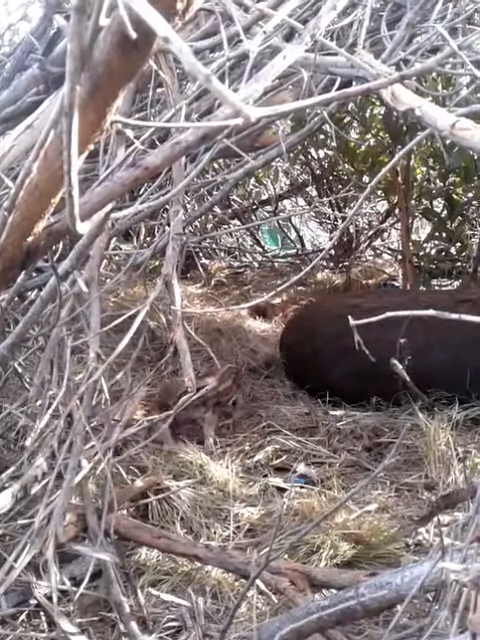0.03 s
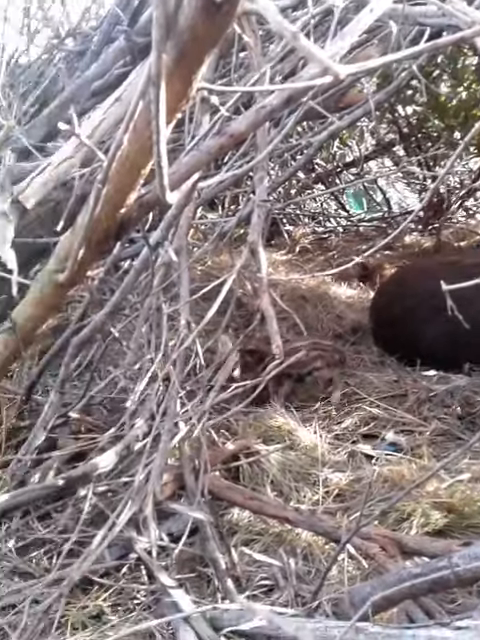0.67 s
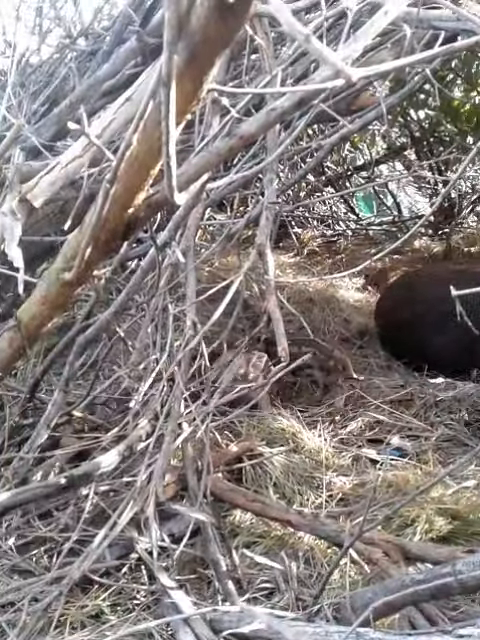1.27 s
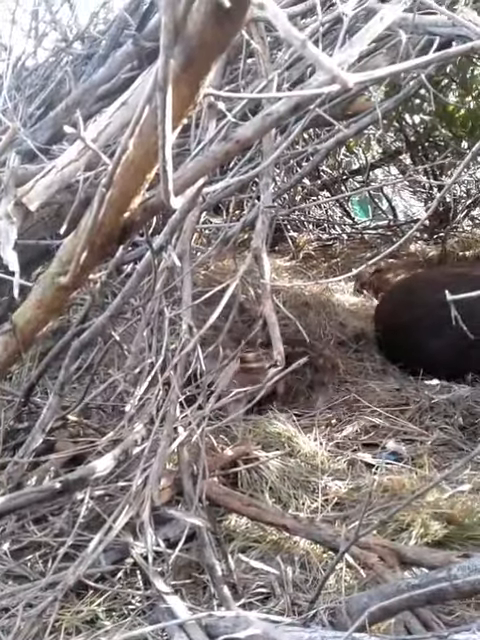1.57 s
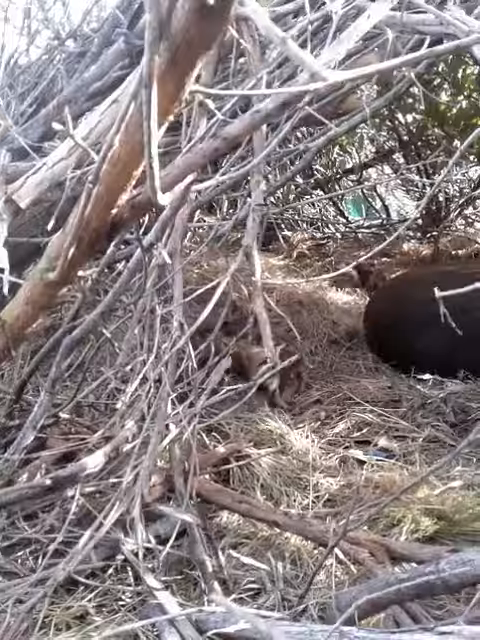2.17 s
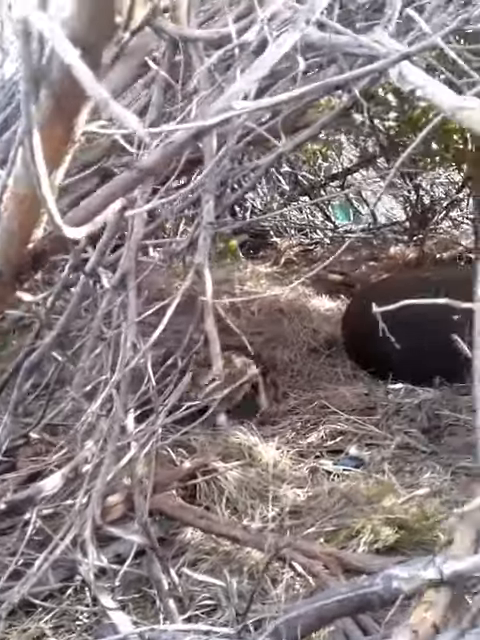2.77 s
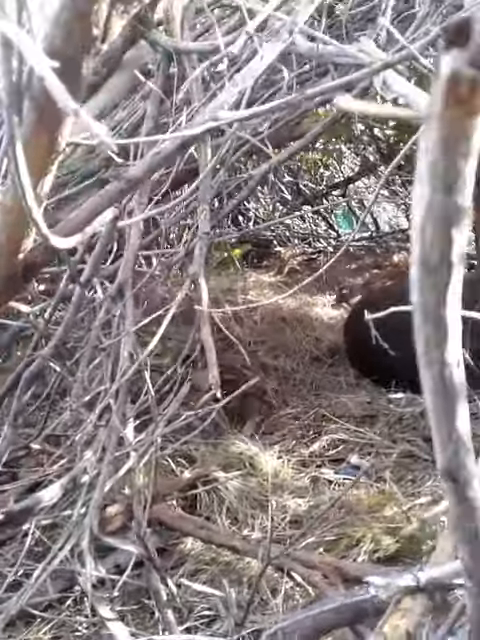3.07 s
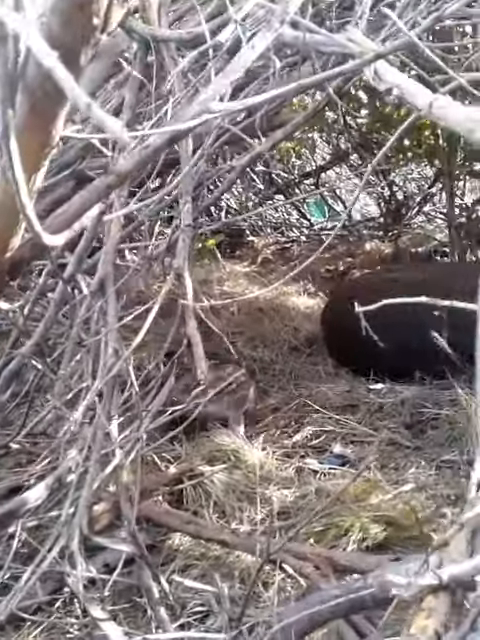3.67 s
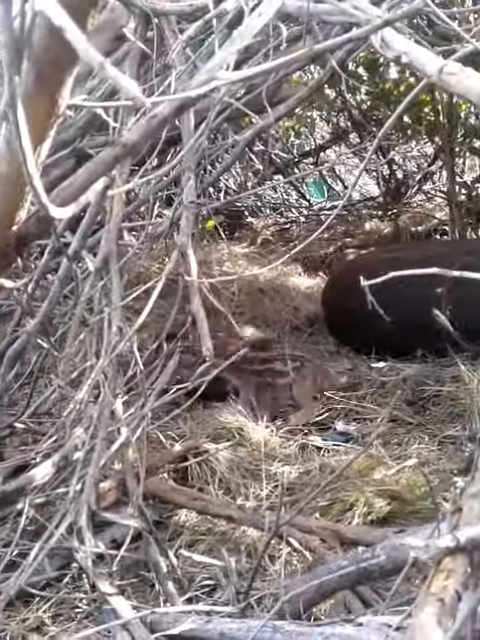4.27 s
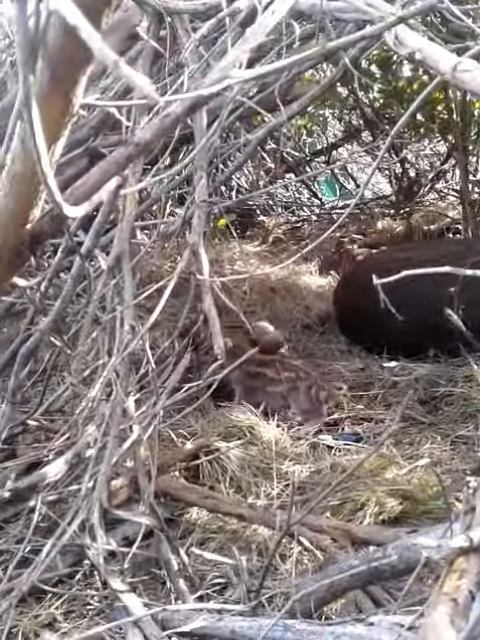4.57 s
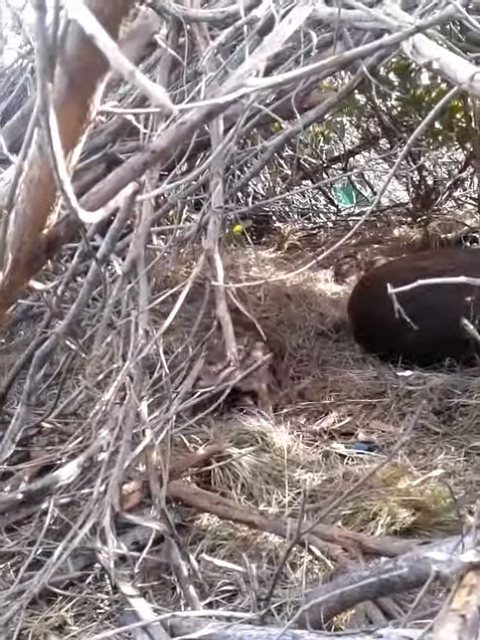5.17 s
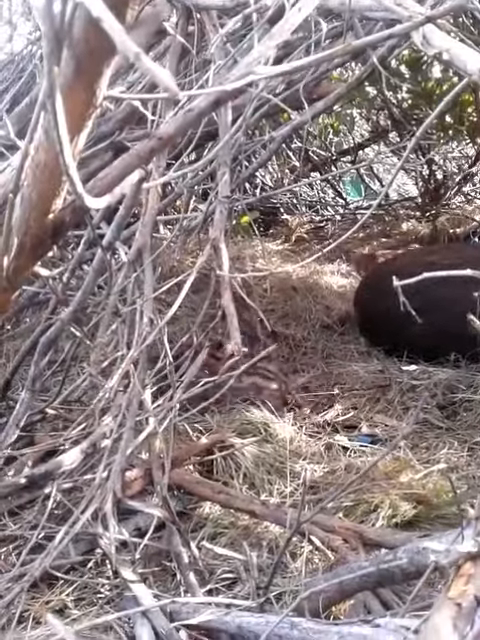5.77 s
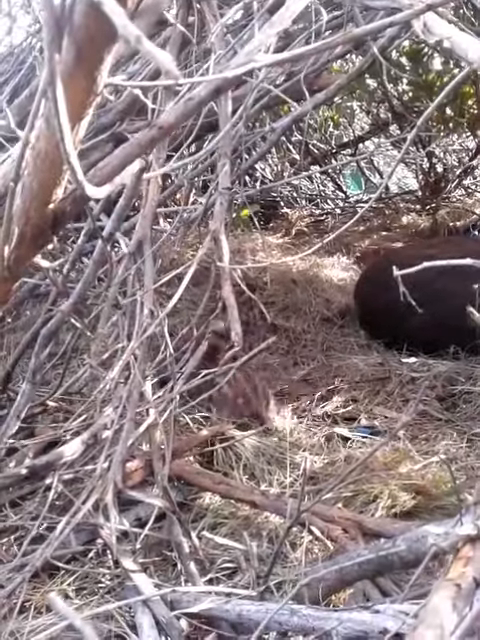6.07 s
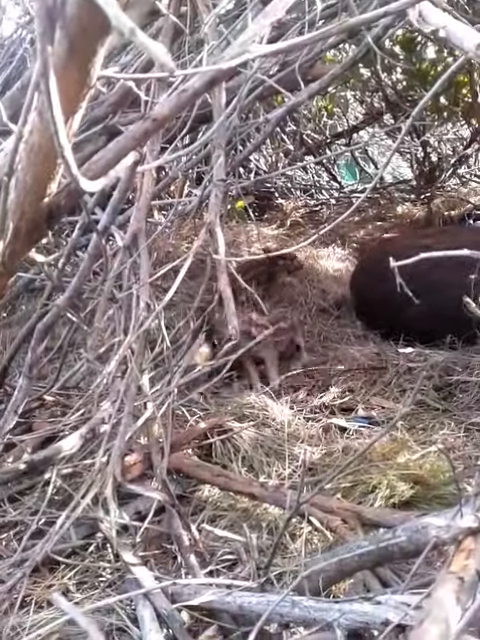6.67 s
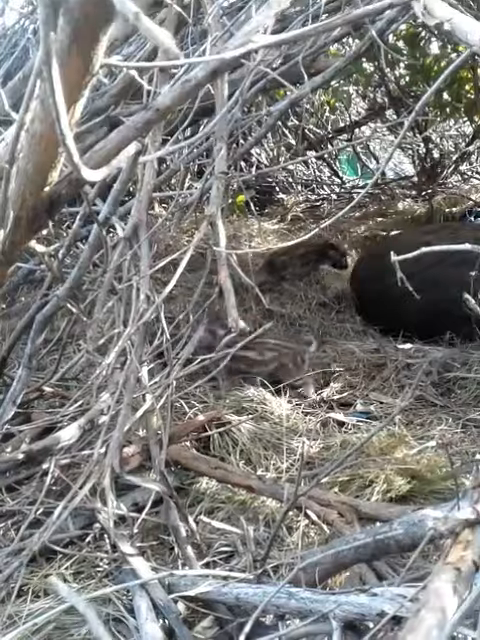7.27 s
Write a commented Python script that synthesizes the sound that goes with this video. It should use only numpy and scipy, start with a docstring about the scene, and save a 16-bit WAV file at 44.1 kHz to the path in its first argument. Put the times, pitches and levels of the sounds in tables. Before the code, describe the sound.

Dry straw crackles and twigs snap as young animals shuffle under dead branches, over a low wind rumble and a faint distant engine.

```python
"""Dry straw crackles and twigs snap, a few metres from the microphone, in the open air.
Young animals are shuffling under a heap of dead branches: each push breaks countless stalks,
twigs scrape over each other, and now and then a knock rings a branch. A faint whistle dies away early.
Behind the heap, a low rumble of wind lulls, then slowly swells along with a far engine.
Heard from one spot, almost mono: only a faint hiss at the microphone ports differs left and right."""
import sys
import numpy as np
from scipy import signal
from scipy.fft import rfft, irfft, next_fast_len
from scipy.io import wavfile
from scipy.ndimage import uniform_filter1d

SR = 44100
rng = np.random.default_rng(int(sys.argv[2]) if len(sys.argv) > 2 else 0)


def store_pcm(level_fs):
    """Save levels as 16-bit WAV."""
    pcm = np.round(np.clip(level_fs, -1, 1) * 32767).astype(np.int16)
    wavfile.write(sys.argv[1], SR, np.atleast_2d(pcm).T)


N = 327663
TIME = np.arange(N) / SR


# steps and shoves under the heap: t/s, push length/s, fine straw level/dB, coarse stalk level/dB
SHUFFLES = [(-.02, 0.22, -43, -56.5), (0.279, 0.11, -45.5, -59), (.385, 0.025, -42, -56),
            (.444, 0.17, -50.5, -62.5), (.63, 0.13, -49.5, -64.5), (.79, .11, -51.5, -64),
            (.973, 0.093, -52.5, -72), (1.115, .06, -54, -67), (1.28, .06, -50, -64),
            (1.38, 0.11, -56, -66), (1.479, 0.11, -45, -56), (1.625, 0.085, -58, -68),
            (1.725, 0.24, -49.5, -63), (2.03, 0.047, -54.5, -61), (2.155, 0.11, -53, -63),
            (2.355, 0.13, -55, -63), (2.6, 0.13, -51.5, -60), (2.825, 0.16, -46, -62),
            (3.025, 0.074, -48, -62), (3.215, 0.058, -49.5, -63.5), (3.305, .05, -47, -61),
            (3.484, 0.18, -48, -63), (3.705, 0.042, -43.5, -60), (3.79, 0.15, -48.5, -61),
            (3.949, .14, -48.5, -64), (4.136, .14, -44.5, -62.5), (4.305, 0.073, -48.5, -59),
            (4.455, 0.097, -48.5, -67), (4.577, 0.063, -44.5, -60.5), (4.717, 0.074, -46.5, -61.5),
            (4.86, 0.15, -46.5, -62.5), (4.985, 0.045, -44.5, -58.5), (5.06, 0.11, -42.5, -59),
            (5.212, 0.034, -50, -61), (5.285, 0.08, -46, -59.5), (5.39, .2, -52, -63.5),
            (5.666, 0.044, -49.5, -73), (5.76, 0.11, -49, -63), (5.96, 0.13, -43.5, -68),
            (6.1, .15, -47.5, -58), (6.305, 0.21, -46.5, -62.5), (6.5, .13, -50.5, -65),
            (6.64, 0.047, -46, -61), (6.715, 0.028, -42.5, -56.5), (6.818, 0.095, -52, -75),
            (6.917, 0.16, -48.5, -62), (7.09, 0.061, -44, -62), (7.226, 0.096, -49, -69),
            (7.341, .09, -47.5, -65)]
def shuffles(attack_s=0.028, settle_s=0.06, stir_start_db=-60, stir_db_per_s=0.61):
    """Straw and stalk levels in dB: a foot loads the litter, holds, and lets it settle."""
    clock = TIME[::44]  # about 1 ms steps
    # the litter never lies quite still, and the animals grow livelier
    stir = undb(stir_start_db + stir_db_per_s * clock)
    straw_power = stir ** 2
    stalk_power = (stir * undb(-11.5)) ** 2
    for s, length_s, straw_db, stalks_db in SHUFFLES:
        t = clock - s
        push = np.clip(t / attack_s, 0, 1) * np.exp(-np.maximum(t - length_s, 0) / settle_s)
        straw_power += (push * undb(straw_db)) ** 2
        stalk_power += (push * undb(stalks_db)) ** 2
    return [np.interp(TIME, clock, 10 * np.log10(power)) for power in (straw_power, stalk_power)]


# spectra of fine straw, brittle stems, splintering tips and coarse stalks: f/Hz, relative level/dB
STRAW_SPECTRUM = [(1000, -40), (2500, -30.5), (4000, -24.5), (5000, -11.5), (5700, -7), (6400, -0.2),
                  (7300, 1), (8000, -2.5), (9000, -8.5), (10200, -16.5), (12500, -19), (15500, -18.5)]
STEM_SPECTRUM = [(1000, -33.5), (3000, -14.5), (5000, -7), (7000, 5.5), (9000, -2.5), (11000, -10),
                 (15500, -13)]
SPLINTER_SPECTRUM = [(4000, -35), (8000, -34), (10500, 8.5), (13000, 11.5), (15500, 2)]
STALK_SPECTRUM = [(300, -26.5), (680, -8), (950, -6.5), (1300, -6.5), (1700, -5.5), (3000, -2.5),
                  (4300, 2.5), (6000, 0), (10000, -25)]
def litter():
    """A few metres off, fine straw and coarse stalks give way in little fits under the animals' feet."""
    straw_db, stalks_db = shuffles()
    fits_db = walk(70) + 1.35 * walk(25)
    # a mass of buried blades, and fewer, crisper ones lying on top
    buried = crackle(per_s=4500, spread_db=3.5, scatter_s=0.0042, scatter_db=4)
    on_top = crackle(per_s=320, spread_db=2, scatter_s=0.001, scatter_db=-6)
    straw = unit(colour(buried + undb(-10.5) * on_top, STRAW_SPECTRUM))
    # single stems tick clear of the mass
    stem_breaks = crackle(per_s=45, spread_db=1, scatter_s=0.0015, scatter_db=-4)
    ticks = unit(colour(stem_breaks, STEM_SPECTRUM)) * undb(-15.5)
    # the driest tips add a flickering sizzle, stronger under a harder push
    tips_db = -23 + 0.2 * (straw_db - straw_db.mean()) + 4.5 * walk(21)
    tip_breaks = crackle(per_s=500, spread_db=2, scatter_s=0.0025, scatter_db=-1)
    tips = unit(colour(tip_breaks, SPLINTER_SPECTRUM)) * undb(tips_db)
    stalk_breaks = crackle(per_s=800, spread_db=1.5, scatter_s=0.008, scatter_db=3.5)
    stalks = unit(colour(stalk_breaks, STALK_SPECTRUM))
    return undb(fits_db) * ((straw + ticks + tips) * undb(straw_db) + stalks * undb(stalks_db))


def crackle(per_s, spread_db, scatter_s, scatter_db):
    """Tiny fractures, mostly weak and a few strong, each scattered briefly by the twigs around."""
    breaks = rng.random(N) < per_s / SR
    strength = undb(spread_db * np.minimum(rng.exponential(size=N), 5))
    clicks = breaks * strength * rng.choice([-1, 1], N)
    t = TIME[:2048]
    echoes = rng.standard_normal(len(t)) * np.exp(-t / scatter_s)
    echo_power = np.maximum(signal.fftconvolve(clicks ** 2, echoes ** 2)[:N], 0)
    scattered = np.sqrt(echo_power) * rng.standard_normal(N)
    return unit(unit(clicks) + undb(scatter_db) * unit(scattered))


# spectra of a twig's sharp crack and of its woody body: f/Hz, relative level/dB
CRACK_SPECTRUM = [(1000, -40.5), (4000, -8.5), (5300, -6.5), (6200, 4.5), (7300, 10.5), (8200, 0),
                  (9200, -3), (10500, -17), (15500, -26)]
WOOD_SPECTRUM = [(250, -20), (450, -12.5), (680, -37), (1000, -15.5), (1800, -12.5), (2800, -3),
                 (4200, 1.5), (5500, 5), (8000, -26), (15000, -39)]
# twigs and stalks breaking in the heap: t/s, crack level/dB, body level/dB, splinter level/dB
SNAPS = [(0.035, -37, -39.5, -54), (0.0383, -35.5, -34.5, -62), (0.145, -37, -68, -58.0),
         (0.157, -33.5, -36, -57.0), (0.169, -34, -34.5, -55), (0.206, -20.5, -41, -40),
         (0.2087, -34, -37, -52), (0.2232, -33.5, -45, -42), (0.238, -39, -62.0, -61),
         (0.4119, -38.5, -52, -46), (0.827, -43, -65, -61), (0.867, -45, -72, -57.0),
         (1.3301, -44, -63, -66), (1.505, -45, -45.5, -66.0), (1.5852, -32.5, -57, -49),
         (1.7154, -43, -52, -62), (1.777, -43.5, -65, -63), (1.9538, -43, -51, -56), (2.737, -45, -52, -63),
         (2.8813, -38.5, -62, -64), (4.2494, -35.5, -60, -50), (4.255, -42, -65, -54),
         (4.345, -40, -48.5, -53), (4.607, -46, -64, -53), (4.7535, -42, -66, -60), (5.1223, -44, -58, -46),
         (5.1679, -33, -46, -55), (5.171, -48, -48, -58), (5.264, -43.5, -62, -59), (5.324, -43, -64, -50),
         (5.357, -46, -68.0, -51), (5.513, -42, -52, -54), (5.692, -45, -60, -58),
         (5.775, -40.5, -48, -62.0), (5.793, -41.5, -50, -59), (5.8147, -41, -39.5, -38),
         (6.026, -52, -74, -52), (6.4193, -37.5, -57, -46), (6.688, -39, -57, -49), (7.158, -44, -53, -52)]
def snaps(break_s=0.0021, scatter_s=0.012, scatter_db=-14):
    """The fibres of a twig tear within a millisecond or two; the heap scatters a short tail."""
    track, t = np.zeros(N), TIME[:2048]
    envelope = np.exp(-(t / break_s) ** 2) + undb(scatter_db) * np.exp(-t / scatter_s)
    for s, *levels_db in SNAPS:
        tear = envelope * rng.standard_normal(len(t))
        for spectrum, db in zip((CRACK_SPECTRUM, WOOD_SPECTRUM, SPLINTER_SPECTRUM), levels_db):
            add(track, s, colour(tear, spectrum), db)
    return track


# twigs flicking or dragging over each other: t/s, f/Hz, level/dB, contact decay/s
SCRAPES = [(0.035, 4450, -38.5, 0.0033), (1.005, 5600, -51, 0.04), (1.304, 2510, -59.5, 0.013),
           (2.0132, 3120, -47, .0015), (2.018, 3150, -57, 0.01), (2.0575, 2710, -59, 0.0027),
           (2.622, 6100, -40.5, 0.015), (3.052, 3700, -53, 0.0076), (3.076, 3420, -57, 0.012),
           (3.595, 3860, -55, .005), (4.893, 3750, -58, 0.0034), (5.168, 4770, -46, 0.0024),
           (5.373, 5630, -44.5, .004), (5.559, 3150, -60, 0.0043), (5.811, 5000, -40.5, 0.0023),
           (7.158, 4300, -54, .008)]
def scrapes(t60=0.0066, grit_gain=0.2):
    """Rough bark catches and slips while the contact lasts, and rings the thin twig."""
    track, t = np.zeros(N), TIME[:6000]
    for s, hz, db, contact_s in SCRAPES:
        slips = rng.standard_normal(len(t)) * np.exp(-t / contact_s)
        ringing = signal.fftconvolve(slips, ring(hz, t60, t))[:len(t)]
        twig = unit(np.gradient(ringing))  # the ring carries hardly any bass
        grit = unit(colour(slips, CRACK_SPECTRUM))
        add(track, s, twig + grit_gain * grit, db)
    return track


# modes of a thick dead branch: f/Hz, relative level/dB, t60/s
BRANCH_MODES = [(440, -8.5, 0.032), (950, 1, 0.024), (1082, -11, 0.068), (1650, -4, 0.023),
                (1905, -1.5, 0.012), (2040, -7, 0.035), (2790, -9, 0.024), (3230, -6, .02)]
# blows on the branches: t/s, level/dB, pitch/ratio to those modes, hardness/dB per octave
KNOCKS = [(0.2084, -53, 0.67, 7), (1.5031, -43.5, 1.0, 2.5), (1.507, -52, 0.93, 12), (1.586, -52, 0.98, 8),
          (5.8119, -50, .92, -3), (5.841, -54.5, 0.94, -5)]
def knocks():
    """A blow rings a branch in the heap; the harder it is, the more of the high modes."""
    track, t = np.zeros(N), TIME[:6000]
    for s, db, pitch, hardness in KNOCKS:
        branch = np.zeros(len(t))
        for hz, mode_db, t60 in BRANCH_MODES:
            gain = rng.choice([-1, 1]) * undb(mode_db + hardness * np.log2(hz))
            branch += gain * ring(hz * pitch, t60, t)
        add(track, s, branch, db)
    return track


def whistle(hz=1464, db=-62.5, t60=1.6):
    """A faint wavering whistle, perhaps air across a twig, dies away at the start."""
    tone = wavering_tone(hz, depth=0.014, per_s=44.4)
    fade = np.exp(-np.log(1000) * TIME / t60)
    return tone * fade * undb(db + 4.1 * walk(28))


# spectra of the wind's rumble, its rush in the trees and a far, narrow rush: f/Hz, relative level/dB
RUMBLE_SPECTRUM = [(20, -40.5), (40, -22.5), (52, -19.5), (65, -7.5), (85, -3.5), (105, -1.5), (135, 1.5),
                   (200, 0.5), (250, -5.5), (300, -14.5), (400, -25), (700, -33.5), (2000, -65)]
AIR_SPECTRUM = [(30, -20.5), (150, -2.5), (350, 2.5), (480, 0), (680, -2), (820, -2.5), (950, -0.5),
                (1200, -2), (1550, -1.5), (2200, -5.5), (4000, -7), (7000, 0.5), (10000, -7),
                (15500, -12.5)]
FAR_RUSH_SPECTRUM = [(400, -33.5), (700, -9.5), (830, 0.5), (970, -2.5), (1150, -14.5), (2000, -33.5)]
# the far rush rising with the wind: t/s, level/dB
FAR_RUSH = [(2.3, -95), (2.6, -74.5), (3.8, -80), (4.3, -73.5), (5.3, -69.5), (6.0, -79), (7.43, -73)]
# the wind behind the heap, a lull and then a swell: t/s, rumble level/dB, air level/dB
WIND = [(0.0, -56, -59), (.4, -57.5, -61), (1.25, -61, -66.5), (2.3, -58, -63), (2.8, -56, -59.5),
        (3.9, -53, -61.5), (5.7, -51.5, -62), (6.3, -50, -57.5), (7.43, -51, -60.5)]
def wind(deep_hz=110, deep_share=0.62):
    """Wind rumbles and rushes through the trees, with small gusts on top of its slow swell."""
    rumble_db, air_db = curves(WIND)
    far_db, = curves(FAR_RUSH)
    gust_db = 0.2 * walk(5)
    eddies = noise(RUMBLE_SPECTRUM)
    # the deepest rumble follows only a share of the swell
    deep = signal.sosfiltfilt(signal.butter(3, deep_hz, fs=SR, output="sos"), eddies)
    deep_db = deep_share * rumble_db + (1 - deep_share) * rumble_db.mean()
    rumble = (deep * undb(deep_db) + (eddies - deep) * undb(rumble_db)) * undb(gust_db)
    air = noise(AIR_SPECTRUM) * undb(air_db + 0.8 * gust_db)
    far_rush = noise(FAR_RUSH_SPECTRUM) * undb(far_db + gust_db)
    return rumble + air + far_rush


# the far engine's two tones: t/s, lower f/Hz, its level/dB, upper f/Hz, its level/dB
ENGINE = [(0, 116.7, -65, 180, -73), (1.5, 118.5, -66, 175.4, -69), (2.9, 120.1, -64.5, 175.6, -58),
          (4.3, 119.4, -57.5, 175, -59), (5.2, 125.4, -58, 170.3, -59), (6.2, 126.9, -63, 168.8, -56.5),
          (7.43, 125, -60, 167.8, -56.5)]
def engine():
    """Far from the microphone an engine drones on two tones, unsteady in pitch and level."""
    low_hz, low_db, high_hz, high_db = curves(ENGINE)
    drone = np.zeros(N)
    for hz, db in (low_hz, low_db), (high_hz, high_db):
        tone = np.sqrt(2) * wavering_tone(hz, depth=0.01438, per_s=14)  # rms 1
        drone += tone * undb(db + 2 * walk(17))
    return drone


# spectrum of the hiss right at the microphone: f/Hz, relative level/dB
PORT_SPECTRUM = [(30, -4), (70, 1), (150, -11), (300, 8), (500, 12), (1000, 8), (2000, -13.5),
                 (4000, -17.5), (7000, -28), (10000, -8.5), (15500, 3.5)]
def port_hiss(db=-78):
    """The air stirs a faint, unsteady hiss of its own at each microphone port, left and right."""
    return np.array([undb(db + 1.3 * walk(30)) * noise(PORT_SPECTRUM) for _ in range(2)])


def undb(db):
    """Decibels to gain."""
    return 10 ** (np.asarray(db) / 20)


def unit(x):
    """Scale to rms 1."""
    return x / np.sqrt(np.mean(x ** 2))


def curves(table):
    """The columns of a table, joined by straight lines in time."""
    s, *columns = np.transpose(table)
    return [np.interp(TIME, s, column) for column in columns]


def colour(x, spectrum):
    """Minimum-phase filter with the given outline (f/Hz, level/dB)."""
    size = 2 * next_fast_len(len(x))
    hz, db = np.transpose(spectrum)
    bin_hz = np.maximum(np.arange(size // 2 + 1) * SR / size, 1)
    gain = undb(np.interp(np.log(bin_hz), np.log(hz), db))
    cepstrum = irfft(np.log(gain))
    # fold onto positive time, so nothing rings ahead of a click
    cepstrum[1:size // 2] *= 2
    cepstrum[size // 2 + 1:] = 0
    return irfft(rfft(x, size) * np.exp(rfft(cepstrum)))[:len(x)]


def noise(spectrum):
    """Steady coloured noise of rms 1."""
    return unit(colour(rng.standard_normal(N), spectrum))


def walk(per_s):
    """A random drift of rms 1 that takes a new course per_s times a second."""
    knots = rng.standard_normal(8192)
    return unit(np.interp(TIME * per_s, np.arange(len(knots)), knots))


def wavering_tone(hz, depth, per_s):
    """A sine whose pitch drifts by the fraction depth (rms)."""
    drifting_hz = hz * (1 + depth * walk(per_s))
    return np.sin(2 * np.pi * np.cumsum(drifting_hz) / SR)


def ring(hz, t60, t):
    """One mode, fading by 60 dB in t60 seconds."""
    return np.sin(2 * np.pi * hz * t) * np.exp(-np.log(1000) * t / t60)


def add(track, s, sound, db):
    """Mix in, at s seconds, a short sound whose loudest 5 ms have the given level."""
    loudest = np.sqrt(uniform_filter1d(sound ** 2, size=220, mode="constant").max())
    start = max(int(s * SR), 0)
    part = track[start:start + len(sound)]
    part += sound[:len(part)] * undb(db) / loudest


def scene():
    """One microphone position in the open air: the heap a few metres off, wind and engine beyond."""
    heap = litter() + snaps() + scrapes() + knocks()
    return heap + whistle() + wind() + engine() + port_hiss()


def record(dry):
    """The recorder cuts the top steeply above 15850 Hz."""
    return signal.sosfilt(signal.ellip(10, 0.1, 70, 15850, fs=SR, output="sos"), dry)


dry = scene()
out = record(dry)
store_pcm(out)
```